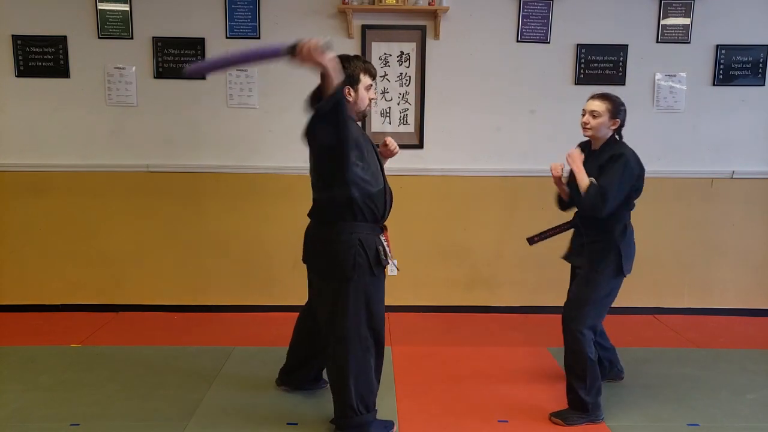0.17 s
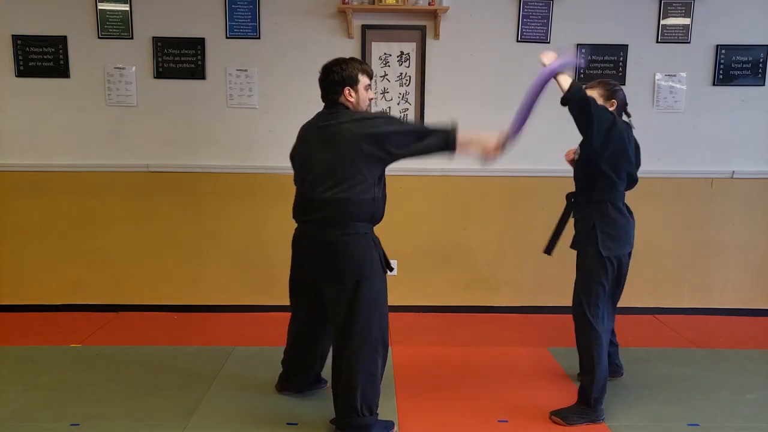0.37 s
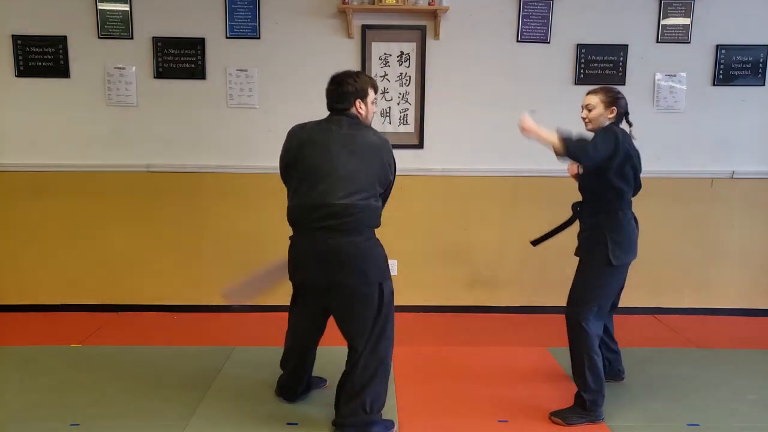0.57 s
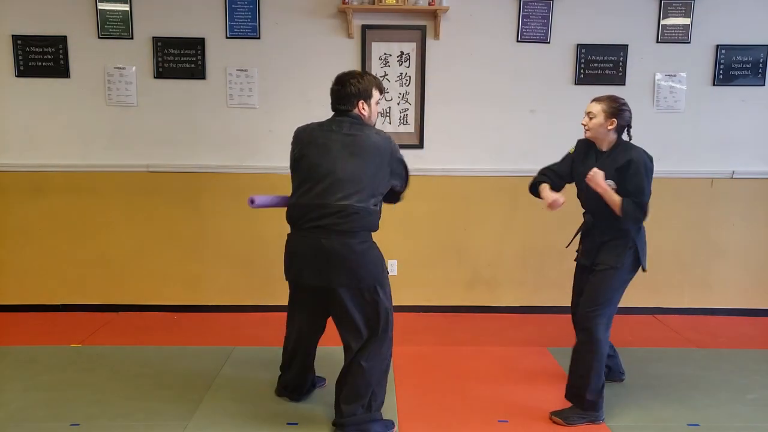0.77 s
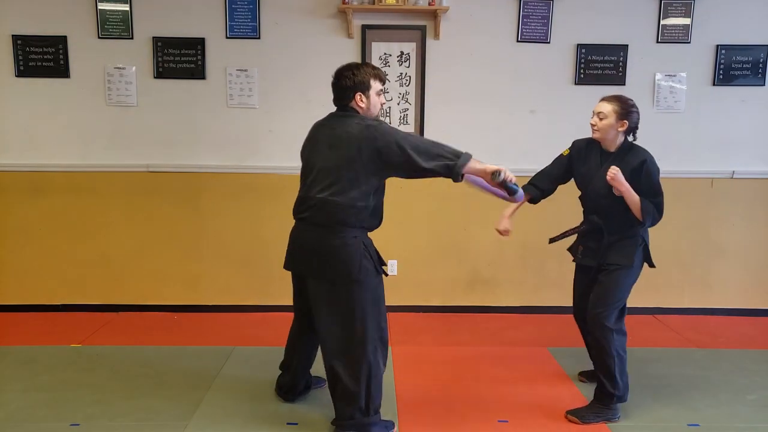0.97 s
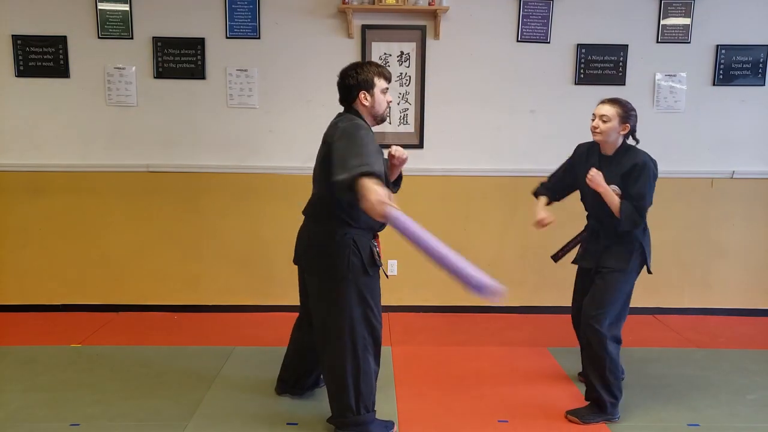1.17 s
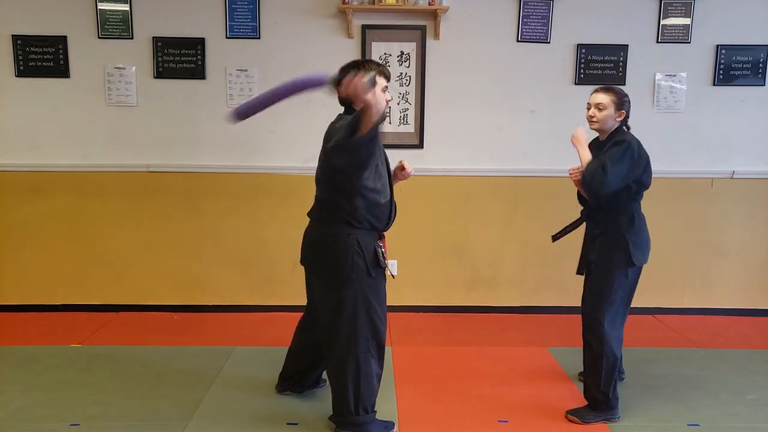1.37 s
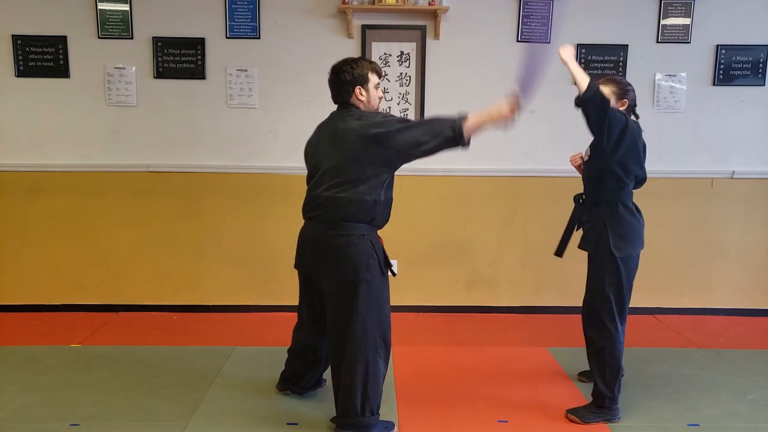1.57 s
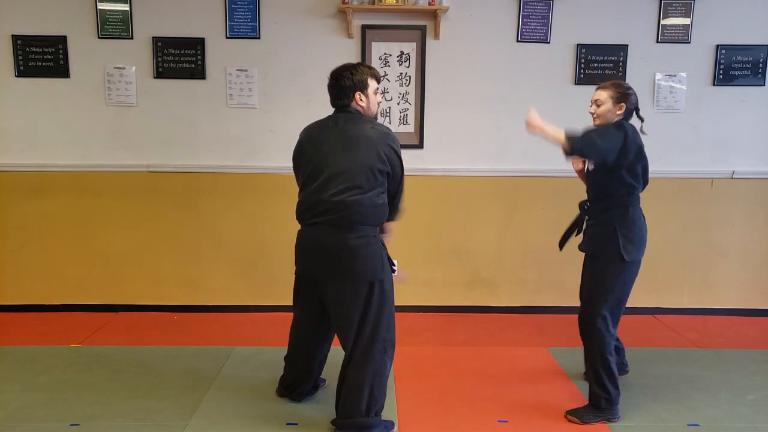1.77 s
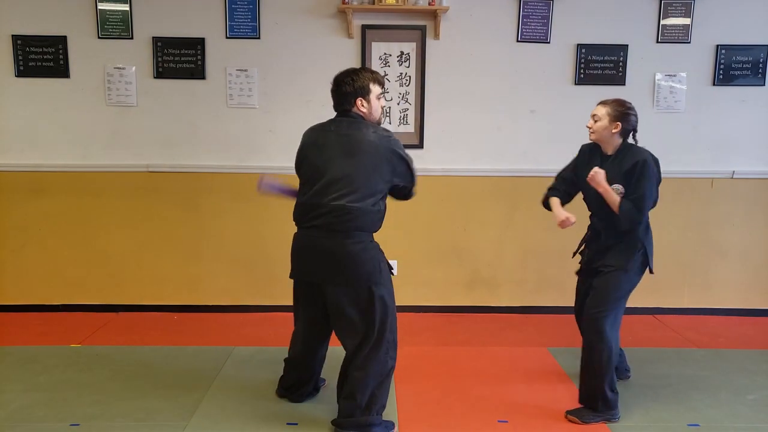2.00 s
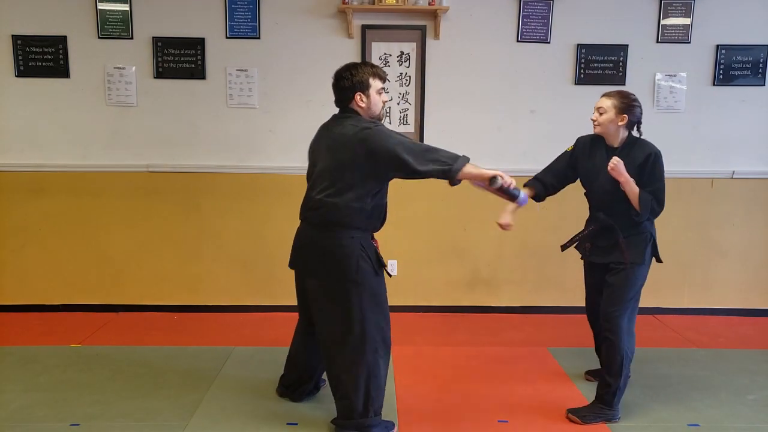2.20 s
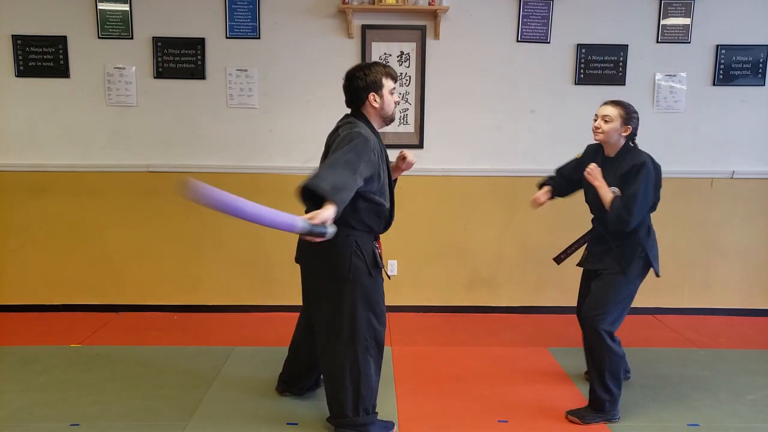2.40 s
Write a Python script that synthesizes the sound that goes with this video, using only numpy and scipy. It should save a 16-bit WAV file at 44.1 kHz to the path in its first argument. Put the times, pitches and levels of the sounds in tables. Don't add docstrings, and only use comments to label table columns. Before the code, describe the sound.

Fleshy foam-tube slaps on forearms with light sleeve rustles between, echoing in a big practice room

```python
import sys
import numpy as np
from scipy import signal
from scipy.fft import rfft, irfft
from scipy.io import wavfile
from scipy.ndimage import uniform_filter1d

SR = 44100
rng = np.random.default_rng(int(sys.argv[2]) if len(sys.argv) > 2 else 0)


def waveform_to_disk(signal):
    frames = np.transpose(np.atleast_2d(signal))
    scaled = np.clip(frames, -1, 1) * 32767
    samples = np.round(scaled).astype(np.int16)
    wavfile.write(sys.argv[1], SR, samples)


def voltage_ratio(level):
    return 10 ** (np.asarray(level, float) / 20)


N = 107736
EARLIER_S = 0.1
HALL_DB = 8.5


def evened(x):
    return x / np.sqrt(np.mean(x ** 2) + 1e-20)


def read(points, hz):
    f, value = np.transpose(points)
    return np.interp(np.log(hz + 1), np.log(f + 1), value)


def colour(x, points):
    hz = np.fft.rfftfreq(x.shape[-1], 1 / SR)
    return irfft(rfft(x) * voltage_ratio(read(points, hz)), x.shape[-1])


def causal(gain):
    log_gain = np.log(np.r_[gain, gain[-2:0:-1]] + 1e-5)
    return np.fft.ifft(np.exp(log_gain - 1j * signal.hilbert(log_gain).imag)).real


def smack(strength_db, ring_hz, ring_db, snap_db):
    # frequency in Hz, level in dB.
    foam = [(200, -7), (700, -6.5), (1500, 1), (2500, -10.5), (5500, -9), (8500, -20.5), (15000, -8.5)]
    # frequency in Hz, level in dB.
    facing = [(2000, 2.5), (3000, -4.5), (4500, -6), (7000, 0.5), (15000, -19)]
    lead = 441
    t = np.arange(-lead, 3655) / SR
    since_contact = np.maximum(t - 0.0005, 0)

    def mode(hz, t60):
        return np.sin(2 * np.pi * hz * since_contact) * voltage_ratio(-60 * since_contact / t60)

    brush = voltage_ratio(-29.5) * np.exp(t / 0.00092)
    envelope = np.where(t < 0, brush, voltage_ratio(-60 * t / 0.014))
    crackle_db = 3.5 * np.repeat(rng.exponential(1, 128), 32)
    cells = rng.standard_normal(len(t)) * voltage_ratio(crackle_db)
    puff = voltage_ratio(-1 + snap_db) * envelope * evened(colour(cells, foam))

    snap = np.roll(causal(voltage_ratio(read(foam, np.fft.rfftfreq(len(t), 1 / SR)))), lead)
    snap = -2 * voltage_ratio(1 + snap_db) * snap / snap.max()
    thud = mode(184, 0.018)
    ring = voltage_ratio(ring_db) * mode(ring_hz, 0.024)

    spectra = rfft(np.array([thud, ring, snap])) * voltage_ratio([[0], [-5], [0]])
    spread = np.roll(causal(np.linalg.norm(spectra, axis=0)), lead)
    direct = thud + ring + colour(snap + puff, facing)
    return voltage_ratio(strength_db) * direct, voltage_ratio(strength_db) * spread


def pair(z, hz):
    # frequency in Hz, left-right likeness from -1 to 1.
    likeness = [(60, .98), (180, .94), (350, .83), (700, .6), (1400, .2), (3000, 0), (6500, -.3),
                (8200, .8)]
    same = np.clip(read(likeness, hz), -1, 1)[:, None]
    return np.array([z[0], same * z[0] + np.sqrt(1 - same ** 2) * z[1]])


def hall(x, spread):
    # frequency in Hz, t60 in seconds.
    decay = [(60, 0.52), (170, 0.7), (280, 0.81), (400, 0.53), (800, 0.51), (1500, 0.44), (3000, 0.57),
             (15000, 0.29)]
    # frequency in Hz, level in dB, t60 in seconds.
    low_modes = [(95, -63.5, 0.6), (195.5, -61, 0.81), (270.4, -59.5, 0.85), (412, -58.5, 0.74)]
    # delay in seconds, level in dB.
    echoes = [(.0024, -7), (.0042, -6), (.0078, -5), (.0098, -8), (.013, -8), (.017, -9)]

    clicks = np.zeros((2, SR))
    at = np.arange(0, SR - 20, 20) + rng.integers(0, 20, (2, (SR - 1) // 20))
    np.put_along_axis(clicks, at, rng.choice([-1., 1.], at.shape), 1)
    hz, t, z = signal.stft(clicks, SR, nperseg=512)
    decayed = pair(z, hz) * voltage_ratio(-60 * t / read(decay, hz)[:, None])
    tail = signal.istft(decayed, SR, nperseg=512)[1][:, :SR]

    t = np.arange(SR) / SR
    rise = 1 - np.exp(-t / 0.0072)
    early_scatter = voltage_ratio(-2.5 - 60 * t / 0.12)
    tail = tail * rise * (1 + early_scatter)
    modes = np.zeros(SR)
    for f, db, t60 in low_modes:
        modes += voltage_ratio(db - 60 * t / t60) * np.sin(2 * np.pi * (f * t + rng.random()))
    tail = voltage_ratio(HALL_DB) * (tail / np.linalg.norm(tail[0]) + modes)

    early = np.zeros((2, SR))
    early[[0, 1], [4, 0]] = 1
    for s, db in echoes:
        shift, side, sign = rng.uniform(-1, 1, 3)
        at = round(s * (1 + 0.12 * shift) * SR)
        early[[0, 1], [at, at + round(8 * side)]] += voltage_ratio(db) * np.sign(sign)
    return signal.fftconvolve(x[None], early, axes=1) + signal.fftconvolve(spread[None], tail, axes=1)


def air():
    # frequency in Hz, level in dB per Hz.
    air_spectrum = [(25, 7), (160, -24.5), (290, -11), (430, -23), (3800, -41.5), (7000, -23), (8500, -44),
                    (15000, -26.5)]
    frames, hz = N // 256 + 5, np.fft.rfftfreq(1024, 1 / SR)
    a, b, c, d, patches = rng.standard_normal((frames, 513, 5)).T
    patches = evened(uniform_filter1d(uniform_filter1d(patches, 12, 0), 14, 1))
    level_db = read(air_spectrum, hz)[:, None] + 1.2 * patches
    z = pair([a + 1j * b, c + 1j * d], hz) * voltage_ratio(level_db)
    return voltage_ratio(-57) * evened(signal.istft(z, nperseg=1024, noverlap=768)[1][:, :N])


def rustle(length, level_db, tilt_db):
    # frequency in Hz, level in dB.
    cloth_spectrum = [(100, -35.5), (700, -13), (1300, -7.5), (2500, -8.5), (6000, 7), (8500, -1.5),
                      (15000, 12.5)]
    grains_per_s, grain_db = 4000, 2.5
    t = np.linspace(-1, 1, 8192)
    stroke = np.exp(-0.5 * (t * 4096 / SR / (length / 4)) ** 2)
    size = voltage_ratio(grain_db * np.minimum(rng.exponential(1, len(t)), 5))
    grains = size * (rng.random(len(t)) < grains_per_s / SR)
    cloth = colour(grains * rng.choice([-1., 1.], len(t)), cloth_spectrum)
    cloth = colour(cloth, [(100, -3.3 * tilt_db), (12800, 11.0 * tilt_db)])
    return voltage_ratio(level_db) * stroke * evened(cloth)


def add(mix, s, sound):
    part = mix[:, round((s + EARLIER_S) * SR):][:, :sound.shape[1]]
    part += sound[:, :part.shape[1]]


def scene():
    # start in seconds, strength in dB, tube ring in Hz,
    # ring over thud in dB, snap over thud in dB.
    smacks = [
        (-.045, -19, 137, 5.5, 5),
        (0.5299, -15, 445, -0.5, 4),
        (1.096, -16.5, 339, 2.5, 4),
        (1.7596, -18, 555, 5, 3.5),
        (2.3305, -16.5, 434, 2, 4),
    ]
    # start in seconds, strength in dB, ring in Hz, ring
    # over thud in dB, snap over thud in dB.
    taps = [
        (0.372, -61, 95, 23.5, -43),
        (.645, -27, 62.2, 9.5, -45),
        (.721, -45, 1130, 6, 14.5),
        (.837, -47.5, 950, 7.5, 6.5),
        (1.373, -49.5, 630, 9.5, 10),
        (1.8751, -20.5, 1010, -8.5, 3.5),
    ]
    # middle in seconds, length in seconds, level in dB, tilt in units of about 2 dB per
    rustles = [
        (0.491, 0.27, -62, -2),
        (0.74, 0.047, -37.5, -4.5),
        (0.904, 0.14, -51.5, -4.5),
        (1.05, .09, -50, -3),
        (1.354, 0.3, -60.5, 0),
        (1.518, 0.11, -61, 13),
        (1.712, 0.096, -71, -4.5),
        (2.141, 0.092, -50.5, -4.5),
        (2.317, 0.045, -71, -22),
    ]
    mix = np.zeros((2, N + round(EARLIER_S * SR)))
    for rows, spread_db in ((smacks, 0), (taps, -4)):
        for s, *row in rows:
            direct, spread = smack(*row)
            add(mix, s - 0.01, hall(direct, voltage_ratio(spread_db) * spread))
    for s, *row in rustles:
        cloth = rustle(*row) / voltage_ratio(HALL_DB)
        add(mix, s - 4096 / SR, hall(cloth, cloth))
    return mix[:, -N:] + air()


def roll_off(x):
    return signal.sosfilt(signal.butter(12, 16800, fs=SR, output="sos"), x)


def record(dry):
    # frequency in Hz, left over right in dB.
    lean = [(30, 1.4), (250, 2.6), (7000, 2.2), (8200, -1.6)]
    hz = np.fft.rfftfreq(N, 1 / SR)
    lean_db = read(lean, hz) * np.array([[0.5], [-0.5]])
    edge_db = np.interp(hz, [15900, 16300], [0, -25])
    low_cut = signal.butter(2, 77, "high", fs=SR, output="sos")
    cut = signal.sosfilt(low_cut, dry)
    return roll_off(irfft(rfft(cut) * voltage_ratio(lean_db + edge_db), N))


dry = scene()
out = record(dry)
waveform_to_disk(out)
```